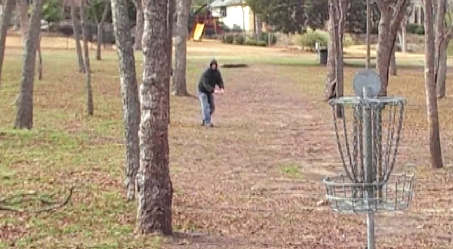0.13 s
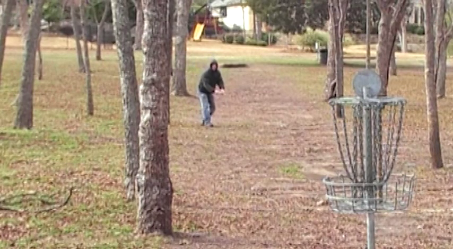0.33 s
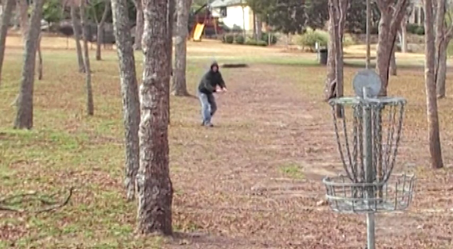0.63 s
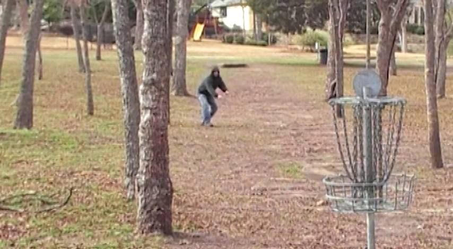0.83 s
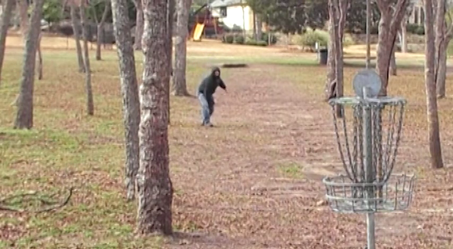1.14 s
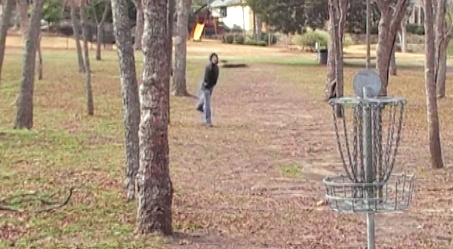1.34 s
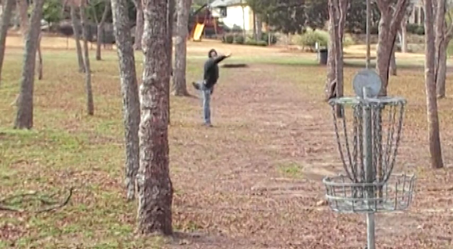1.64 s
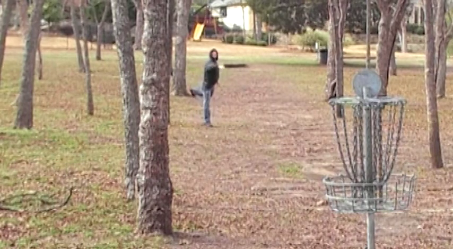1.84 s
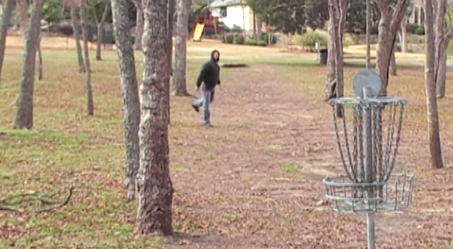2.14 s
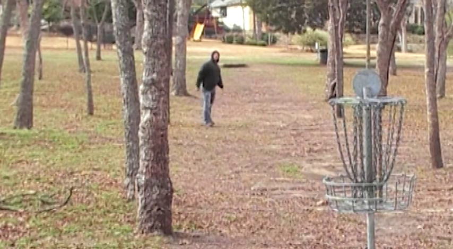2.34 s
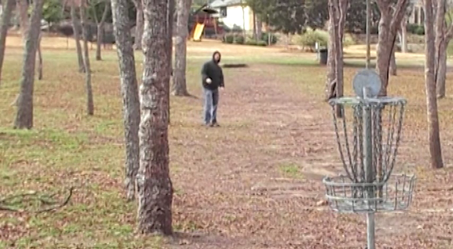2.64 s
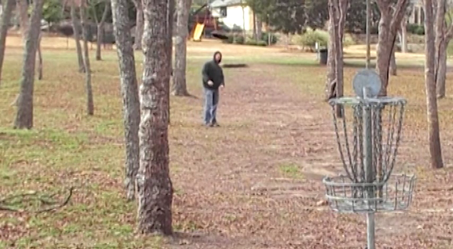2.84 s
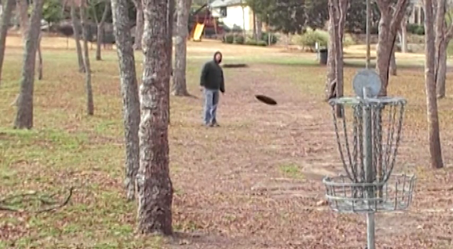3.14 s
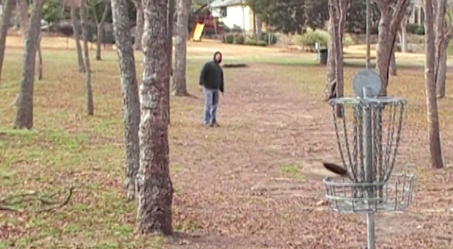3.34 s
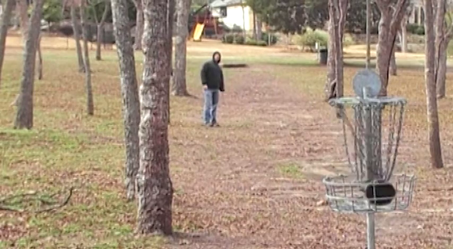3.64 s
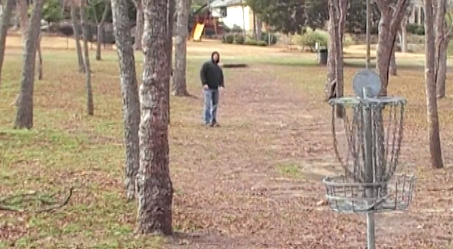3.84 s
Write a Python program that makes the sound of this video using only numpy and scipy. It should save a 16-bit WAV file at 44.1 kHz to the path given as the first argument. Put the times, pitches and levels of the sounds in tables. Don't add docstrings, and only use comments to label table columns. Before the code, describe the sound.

A flying disc crashes into steel basket chains after quiet park air, ringing and rattling brightly

```python
import sys
import numpy as np
from scipy import signal
from scipy.fft import rfft, irfft, next_fast_len
from scipy.io import wavfile
from scipy.ndimage import uniform_filter1d, map_coordinates

SR = 44100
rng = np.random.default_rng(int(sys.argv[2]) if len(sys.argv) > 2 else 0)


def log_audio(samples):
    frames = np.atleast_2d(samples).T
    limited = np.clip(frames, -1, 1)
    pcm = np.round(limited * 32767).astype(np.int16)
    wavfile.write(sys.argv[1], SR, pcm)


def level_to_linear(level):
    exponent = np.asarray(level, float) / 20
    return 10 ** exponent


N = 176400

# pitch_hz, level_db
PARK_SPECTRUM = [(15, -45), (25, -36), (80, -6), (383, -3.5), (501, -3), (837, -1.5), (3800, -22.5),
                 (8090, -29.5), (15900, -43)]
# start_s, level_db
PARK_LEVEL = [(0, -48), (3.4, -49), (4, -45.5)]
# pitch_hz, likeness (1 = equal)
PARK_COHERENCE = [(30, -.4), (70, .05), (200, .85), (500, .96), (1600, .95), (5000, .5), (15000, .1)]
# pitch_hz, level_db
PARK_BALANCE = [(60, 2), (15000, 1)]
# pitch_hz, rms_level_db
STEADY_TONES = [(9076, -76.5)]
# start_s, length_s, centre_hz, width_hz, level_db
LEAVES = [(0.051, 0.35, 2000, 600, -55), (0.122, .15, 8400, 3000, -66), (1.11, .07, 650, 350, -48),
          (1.351, .06, 2100, 800, -53), (2.17, 0.13, 4900, 500, -64), (2.65, .05, 11100, 4000, -68),
          (3.161, .12, 3100, 200, -60.5), (0.597, .012, 9500, 4960, -64), (.682, .012, 12000, 4000, -66),
          (1.465, .07, 11800, 1500, -69), (1.370, .008, 4200, 500, -58), (1.377, .008, 2200, 400, -50),
          (1.389, .006, 4400, 400, -53), (1.389, .006, 7300, 800, -60)]
# start_s, length_s, start_hz, end_hz, level_db
BIRDS = [
    (1.262, 0.03, 8470, 7400, -53.5),
    (1.391, .11, 1770, 1734, -61),
    (1.92, .025, 7040, 6800, -65.5),
    (2.322, 0.013, 2850, 2950, -58),
    (2.365, .016, 2900, 2870, -60),
    (2.466, .05, 1454, 1455, -58),
    (2.574, 0.04, 1410, 1380, -59),
    (2.959, .03, 7440, 7300, -70),
    (3.32, .02, 6600, 7700, -67),
]
# start_s, level_db
KNOCKS = [
    (2.730, -43),
    (2.828, -36.5),
    (2.905, -39),
    (2.938, -39),
    (3.038, -41),
]
# pitch_hz, level_db, t60_s
HOLLOW_MODES = [(467, 0, 0.3), (580, -7, .2), (720, -7, .2)]
# start_s, level_db, pitch_hz, t60_s
DISC_CONTACTS = [(3.4985, -4, 2750, 0.0047), (3.5028, -17.5, 1476, 0.052), (3.504, -23, 940, 0.023),
                 (3.545, -21, 1160, 0.011), (3.566, -35, 940, .012), (3.6353, -6, 1410, 0.007),
                 (3.636, -34.5, 439, 0.11), (3.8267, -12, 1360, 0.0057), (3.827, -24.5, 850, 0.018),
                 (3.845, -21, 1320, 0.013), (3.907, -25, 1250, 0.011), (3.957, -31.5, 3920, .012),
                 (3.895, -23, 8900, .04), (3.935, -21, 8870, 0.085)]
LINK_HZ = [1600, 2640, 2850, 5080, 6400, 6930, 7390, 7900, 8210, 9030, 11400, 11970, 12680, 13850]
# spread_between_links_hz, level_db, t60_s
LINK_MODES = [(70.5, -34, 0.27), (40.6, -27, 0.37), (91.4, -24.5, 0.31), (48.6, -20, 0.18),
              (200, -35, 0.074), (29.8, -21, 0.18), (39.8, -19, 0.16), (130, -14, 0.059),
              (30.4, -19.5, 0.17), (60, -16, 0.15), (121, -11.5, 0.18), (111, -5.5, 0.18), (89, -10.5, 0.2),
              (160, -18, 0.14)]
# start_s, level_db
SWING = [
    (3.4985, -20.5),
    (3.51, -13),
    (3.545, -30),
    (3.61, -32.5),
    (3.64, -27.5),
    (3.69, -30),
    (3.76, -31.5),
    (3.82, -36),
    (4.0, -42),
]
# start_s, level_db
CLASHES = [(3.5022, -26), (3.5085, -24), (3.520, -34), (3.528, -30), (3.552, -20), (3.584, -19),
           (3.598, -31), (3.631, -19), (3.684, -32), (3.702, -23.5), (3.746, -31), (3.797, -39),
           (3.865, -29), (3.896, -29.5), (3.916, -28.5), (3.963, -31)]
# pitch_hz, level_db
CLINK_SPECTRUM = [(300, -28), (700, -16), (1900, -9.5), (4000, -10.5), (7500, -0.5), (10400, -5.5),
                  (13500, -8.5), (15800, -17)]
# start_s, level_db, pitch_hz
BRIGHT_STRIKES = [(3.5077, -5, 11990), (3.5154, -9, 12080), (3.5276, -9, 12000), (3.5374, -4, 12000),
                  (3.5511, -3, 12000), (3.584, -4, 11970), (3.591, -6, 11880), (3.6034, -10, 12000),
                  (3.6164, -12, 12000), (3.6304, -12, 12000), (3.6444, -15, 12100), (3.6813, -15, 12100),
                  (3.6888, -14, 11900), (3.7044, -15, 12000), (3.7262, -15, 11900), (3.7456, -15.5, 11900),
                  (3.7861, -22, 12000), (3.797, -17, 12060), (3.8114, -17.5, 11870), (3.8636, -16.5, 12100),
                  (3.8773, -18, 11900), (3.8978, -15.5, 12000), (3.9158, -12, 11900), (3.9294, -19, 12100),
                  (3.9492, -16, 12100), (3.9632, -15, 12060), (3.9701, -17, 12080)]
# start_s, level_db, pitch_hz
UPPER_STRIKES = [(3.5085, -14, 12500), (3.5516, -10, 12600), (3.5845, -14, 12700), (3.596, -11, 12600),
                 (3.6813, -23, 12700), (3.6898, -19, 12700), (3.7451, -22, 12700), (3.7975, -25, 12700),
                 (3.8407, -24, 12700), (3.8656, -23, 12700), (3.9148, -19, 12700), (3.9294, -19, 12700),
                 (3.9637, -22, 12700)]
# start_s, pitch_hz, level_db
ROD_RINGS = [(3.535, 7400, -17), (3.536, 7720, -9), (3.576, 7380, -15), (3.698, 7380, -18),
             (3.703, 7950, -17), (3.746, 7430, -22), (3.746, 7900, -21), (3.57, 8200, -21),
             (3.587, 9050, -21.5), (3.79, 5900, -37), (3.843, 9050, -29), (3.63, 6400, -20.5),
             (3.59, 5070, -28), (3.878, 5080, -32.5), (3.632, 5100, -28), (3.578, 2610, -26.5),
             (3.692, 2680, -28), (3.795, 2620, -32.5), (3.51, 2800, -29), (3.845, 11400, -22.5)]
# start_s, pitch_hz, level_db, t60_s
TRAY_RINGS = [(3.636, 1400, -38.5, 1.12), (3.636, 1739, -44.5, 0.88), (3.636, 641, -47.5, 1.1),
              (3.70, 2000, -38, 0.42), (3.54, 2606, -34.5, 0.41), (3.54, 2686, -36, 0.66),
              (3.63, 2627, -31.5, 0.5), (3.827, 1583, -39, 0.54), (3.625, 7380, -27.5, .7),
              (3.58, 6930, -32, .4), (3.8, 6930, -36, 0.82), (3.77, 3090, -29, 0.13), (3.6, 5060, -39, .8),
              (3.83, 8210, -34, 0.98), (3.835, 5085, -36.5, 0.63), (3.93, 2810, -52, 0.37),
              (3.79, 470, -43.5, 0.53)]
BASKET_BAND_HZ = [350, 15500]
# pitch_hz, level_db
PORT_BALANCE = [(60, 5), (380, -1), (2380, 1.5), (15000, -3.5)]
# pitch_hz, phase_rad
PORT_LEAD = [(0, 0.44), (8440, -0.16), (9820, -1.15), (12700, -0.42), (15800, 0.3)]

CRASH_S = SWING[0][0]
START_S = 3.45
SIDES = np.array([[1], [-1]])


def unit(x):
    return x / np.sqrt(np.mean(x ** 2) + 1e-20)


def along(points, hz):
    f, v = np.transpose(points)
    return np.interp(np.log(hz + 1), np.log(f + 1), v)


def wobble(rate_hz):
    knots = rng.standard_normal(int(N * rate_hz / SR) + 4)
    return map_coordinates(knots, [np.arange(N) * rate_hz / SR])


def filtered(x, response):
    n = x.shape[-1]
    m = next_fast_len(n + SR // 2)
    return irfft(rfft(x, m) * response(np.fft.rfftfreq(m, 1 / SR)), m)[..., :n]


def add(out, start_s, piece):
    i = round(start_s * SR)
    out[..., i:i + piece.shape[-1]] += piece[..., :out.shape[-1] - i]


def ring(hz, t60, size, attack_s):
    t = np.arange(size) / SR
    return np.sin(2 * np.pi * hz * t) * level_to_linear(-60 * t / t60) * (1 - np.exp(-t / attack_s))


def park():
    t = np.arange(N) / SR
    z = signal.stft(rng.standard_normal((2, N)), nperseg=512)[2]
    patches = uniform_filter1d(rng.standard_normal(z.shape[1:]), size=6, axis=0)
    patches = uniform_filter1d(patches, size=12, axis=1)
    pair = signal.istft(z * level_to_linear(0.71 * unit(patches)), nperseg=512)[1][:, :N]

    def mid_side(f):
        turn = np.arccos(np.clip(along(PARK_COHERENCE, f), -1, 1)) / 2
        return level_to_linear(along(PARK_SPECTRUM, f)) * [np.cos(turn), np.sin(turn)]

    mid, side = filtered(pair, mid_side)
    air = np.array([mid + side, mid - side])
    air = filtered(air, lambda f: level_to_linear(SIDES / 2 * along(PARK_BALANCE, f)))
    air_db = np.interp(t, *np.transpose(PARK_LEVEL)) + 2.5 + 0.66 * wobble(8.89)

    hum_db, hum_end_s = -59.5 + 4.4 * wobble(7.94), 1.18
    hum_hz = 179 + 3.1 * wobble(8.07)
    hum = level_to_linear(hum_db) * np.sin(2 * np.pi * np.cumsum(hum_hz) / SR) / (1 + (t / hum_end_s) ** 6)

    duck_db, recovery_s = -7.5, 0.12
    since = t - CRASH_S
    duck = level_to_linear(duck_db * (since > 0) * np.exp(-np.abs(since) / recovery_s))
    return duck * (unit(air) * level_to_linear(air_db) + hum)


def whine():
    whine_hz, gated_db, side_db = 7867, -66, -74
    gate_s, gate_first_s = 2 / 29.97, 0.0595
    t = np.arange(N) / SR
    gate = uniform_filter1d(((t - gate_first_s) / gate_s % 1 < 0.5) * 1.0, size=60)
    tone = np.sqrt(2) * np.sin(2 * np.pi * whine_hz * t)
    steady = sum(level_to_linear(db) * np.sqrt(2) * np.sin(2 * np.pi * hz * t) for hz, db in STEADY_TONES)
    return tone * (level_to_linear(gated_db) * gate + level_to_linear(side_db) * SIDES) + steady * level_to_linear(1.5 * SIDES)


def leaves():
    out = np.zeros((2, N))
    for start_s, length_s, centre_hz, width_hz, db in LEAVES:
        n = round(length_s * SR)
        noise = rng.standard_normal((2, 3 * 8192))
        band = unit(filtered(noise, lambda f: np.exp(-((f - centre_hz) / width_hz) ** 2)))[:, :n]
        add(out, start_s, level_to_linear(db) * np.hanning(n) * (band[0] + 0.25 * band[1] * SIDES))
    return out


def birds():
    glide_share = 0.23
    out = np.zeros(N)
    for start_s, length_s, start_hz, end_hz, db in BIRDS:
        u = np.linspace(0, 1, round(length_s * SR))
        hz = end_hz + (start_hz - end_hz) * np.exp(-u / glide_share)
        add(out, start_s, level_to_linear(db + 6) * np.sin(np.pi * u) ** 0.35 * np.sin(2 * np.pi * np.cumsum(hz) / SR))
    return out * level_to_linear(0.8 * SIDES)


def knocks():
    swell_s, tail_db = 0.048, -10
    out, t = np.zeros(N), np.arange(8000) / SR
    swell = np.sin(np.pi * np.clip(t / swell_s, 0, 1))
    rise = np.clip(2 * t / swell_s, 0, 1)
    for start_s, db in KNOCKS:
        for hz, mode_db, t60 in HOLLOW_MODES:
            level = level_to_linear(db + mode_db + rng.normal(0, 1.6))
            envelope = swell + level_to_linear(tail_db - 60 * t / t60) * rise
            add(out, start_s, level * envelope * np.sin(2 * np.pi * hz * rng.normal(1, 0.021) * t))
    return out


def disc():
    out = np.zeros(N)
    for start_s, db, hz, t60 in DISC_CONTACTS:
        add(out, start_s, level_to_linear(db) * ring(hz, t60, 6000, 0.00047))

    scrape_s, scrape_db, low_hz, high_hz = 0.051, -30, 850, 2400
    grit = unit(filtered(rng.standard_normal(8192),
                         lambda f: 1 / (1 + (low_hz / (f + 1)) ** 12) / (1 + (f / high_hz) ** 4)))
    u = np.linspace(0, 1, round(scrape_s * SR))
    add(out, CRASH_S, level_to_linear(scrape_db - 6.9 * u) * (1 - u ** 6) * grit[:len(u)])
    return out


def chains(count=10, size=470):
    hz, (spread_hz, mode_db, t60) = np.array(LINK_HZ), np.transpose(LINK_MODES)
    n = N - round(START_S * SR)

    rattle_rate_hz, rattle_scatter_db, rattle_ring_db = 900, 4, -4
    clash_spread_s, clash_clink_db = 0.006, -9
    small = CRASH_S + np.cumsum(rng.exponential(1, size)) / rattle_rate_hz
    small_db = np.interp(small, *np.transpose(SWING)) + rattle_scatter_db * rng.standard_normal(size)
    clash = np.repeat(CLASHES, 4, axis=0)
    times = np.r_[small, clash[:, 0] + clash_spread_s * rng.random(len(clash))]
    at = np.clip(np.round((times - START_S) * SR).astype(int), 0, n)

    level_db = np.r_[small_db + rattle_ring_db, clash[:, 1]][:, None] + mode_db
    gain = level_to_linear(level_db + 3 * rng.standard_normal(level_db.shape))
    gain = gain * rng.choice([-1, 1], level_db.shape)

    link = np.arange(len(at)) % count
    detune = np.clip(rng.standard_normal((count, len(hz))), -2, 2)
    touch_db, touch_rate_hz = 3, 45
    curve = np.r_[wobble(touch_rate_hz), wobble(touch_rate_hz)]
    touch = level_to_linear(touch_db * curve[:count * n].reshape(count, n))
    out = np.zeros(n)
    for k in range(count):
        blows = np.zeros((len(hz), n + 1))
        np.add.at(blows, (slice(None), at[link == k]), gain[link == k].T)
        modes = ring((hz + spread_hz * detune[k])[:, None], t60[:, None], n // 2, 0.0016)
        out += signal.fftconvolve(blows, modes, axes=1)[:, :n].sum(0) * touch[k]

    clink_t60, hiss_db, stray_db = 0.027, -3.5, -6
    contact_db = np.r_[small_db, clash[:, 1] + clash_clink_db]
    power = np.bincount(at, level_to_linear(2 * contact_db), n + 1)
    decay = level_to_linear(-120 * np.arange(2000) / SR / clink_t60)
    fade = np.sqrt(np.abs(signal.fftconvolve(power, decay)[:n]))
    noise = unit(filtered(rng.standard_normal(n), lambda f: level_to_linear(along(CLINK_SPECTRUM, f))))
    out = out + level_to_linear(hiss_db) * fade * noise + level_to_linear(stray_db) * stray_modes(at, contact_db, n)
    return np.pad(out, (N - n, 0))


def stray_modes(at, contact_db, n, count=6, size=800):
    hz = rng.uniform(1000, 15500, (len(at), count, 1))
    level_db = contact_db[:, None, None] + along(CLINK_SPECTRUM, hz) + 3.5 * rng.standard_normal(hz.shape)
    grains = (level_to_linear(level_db) * ring(hz, 0.042, size, 0.00023)).sum(1)
    return np.bincount((at[:, None] + np.arange(size)).ravel(), grains.ravel(), n)[:n]


def strikes():
    t60, pair_hz, strike_db, crack_db, crack_t60 = 0.11, 62, -4, -28, 0.006
    out, t = np.zeros(N), np.arange(300) / SR
    for start_s, db, hz in BRIGHT_STRIKES + UPPER_STRIKES:
        pair = ring(hz, t60, 8000, 0.00061)
        pair = pair + 0.43 * ring(hz + pair_hz * rng.normal(), t60, 8000, 0.0008)
        add(out, start_s, level_to_linear(db + strike_db) * pair)
        crack = np.diff(rng.standard_normal(len(t) + 1))
        add(out, start_s, level_to_linear(db + crack_db - 60 * t / crack_t60) * crack)
    return out


def rods():
    out = np.zeros(N)
    for start_s, hz, db in ROD_RINGS:
        spread_hz, _, t60 = LINK_MODES[np.argmin(np.abs(np.array(LINK_HZ) - hz))]
        pair = ring(hz, t60, 12000, 0.00073) + 0.36 * ring(hz + spread_hz, t60, 12000, 0.001)
        add(out, start_s, level_to_linear(db) * pair)
    return out


def tray():
    out = np.zeros(N)
    for start_s, hz, db, t60 in TRAY_RINGS:
        add(out, start_s, level_to_linear(db) * ring(hz, t60, SR // 2, 0.003))
    return out


def ports(x):
    low_hz, high_hz = BASKET_BAND_HZ
    x = signal.sosfilt(signal.butter(4, low_hz, 'high', fs=SR, output='sos'), x)
    x = filtered(x, lambda f: 1 / (1 + (f / high_hz) ** 60))
    half = SIDES / 2
    return filtered(x, lambda f: level_to_linear(half * along(PORT_BALANCE, f)) * np.exp(1j * half * along(PORT_LEAD, f)))


def trees(x):
    t60, level_db = 0.05, -20
    t = np.arange(4000) / SR
    tail = rng.standard_normal((2, len(t))) * level_to_linear(-60 * t / t60)
    return x + level_to_linear(level_db) * signal.fftconvolve(x, tail / np.linalg.norm(tail[0]), axes=1)[:, :N]


def scene():
    basket = trees(ports(disc() + chains() + strikes() + rods() + tray()))
    return park() + whine() + leaves() + birds() + knocks() + basket


def band_limit(x):
    return signal.sosfilt(signal.butter(12, 16200, fs=SR, output="sos"), x)


def record(dry):
    mix = np.clip(dry, -1, 1)
    return band_limit(mix)


dry = scene()
out = record(dry)
log_audio(out)
```